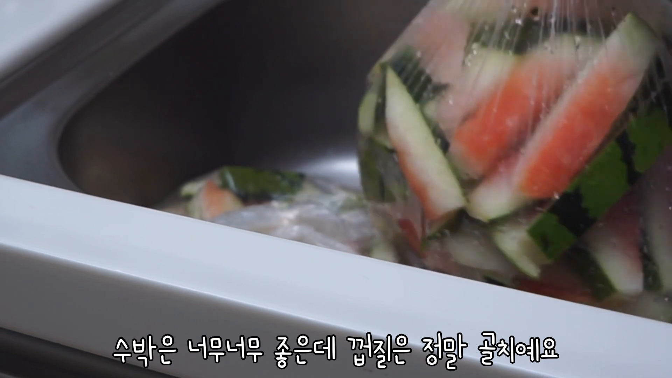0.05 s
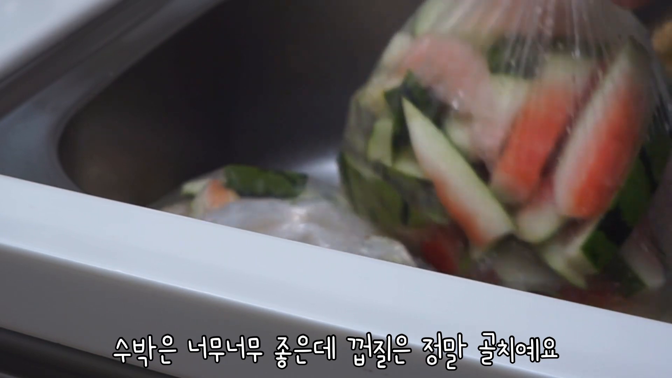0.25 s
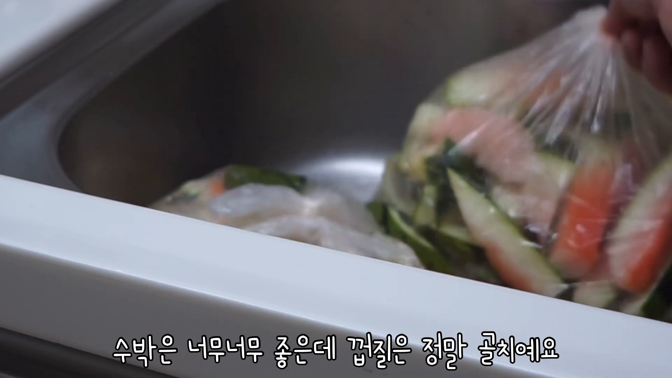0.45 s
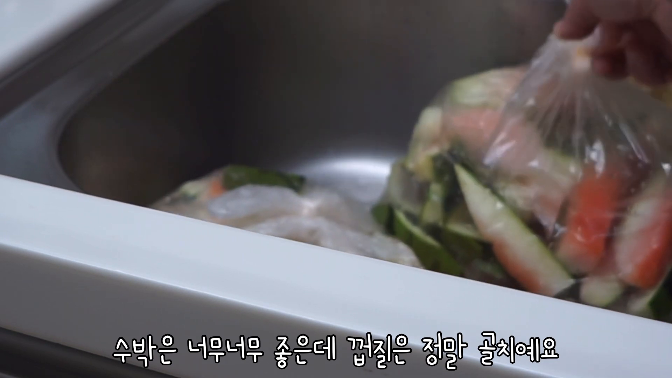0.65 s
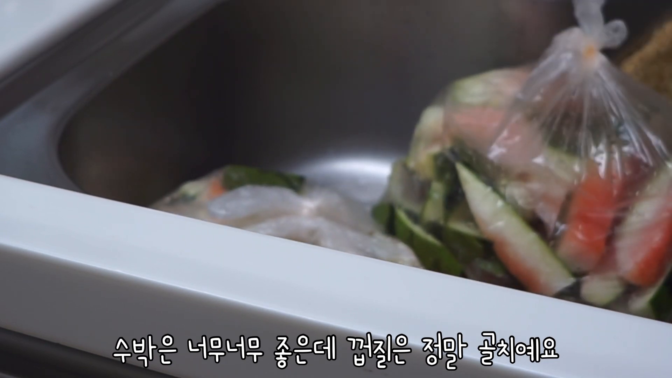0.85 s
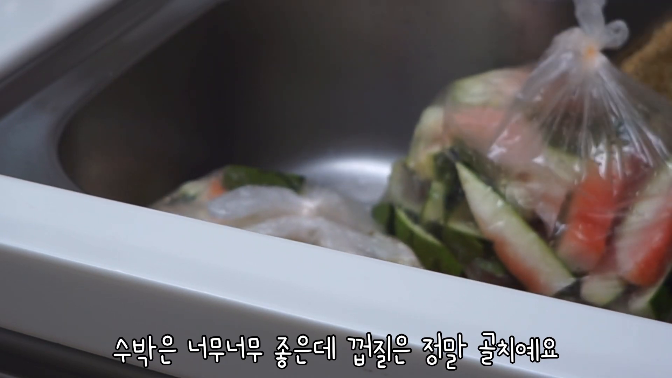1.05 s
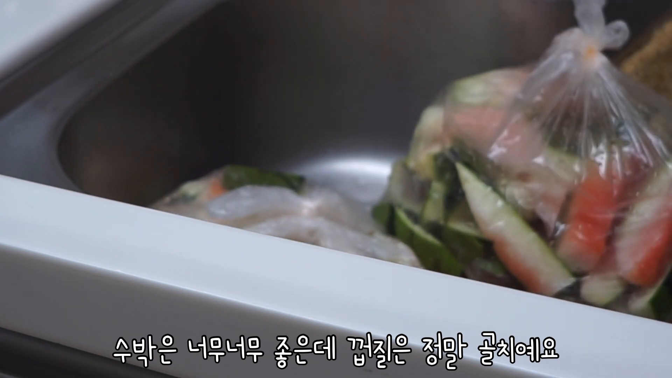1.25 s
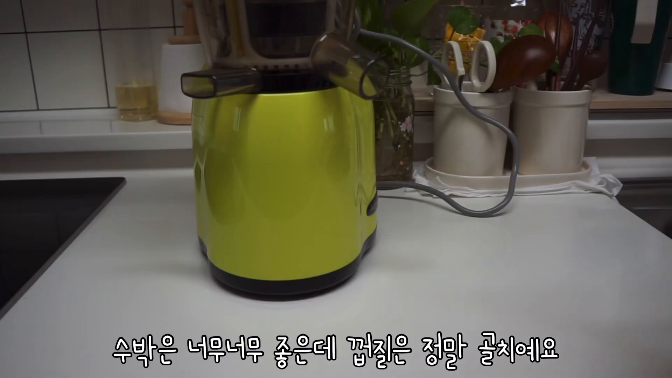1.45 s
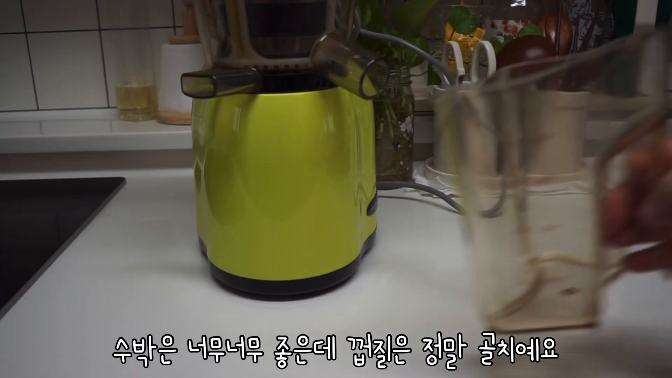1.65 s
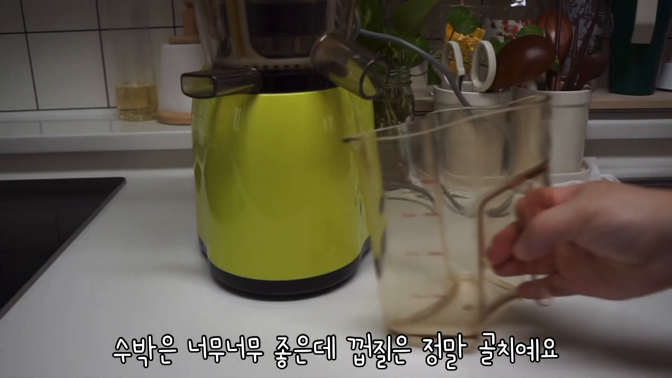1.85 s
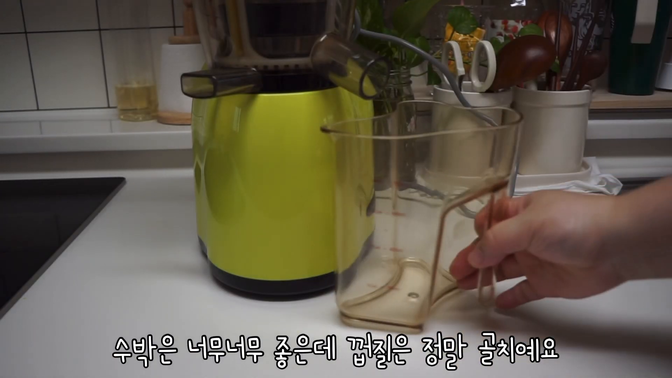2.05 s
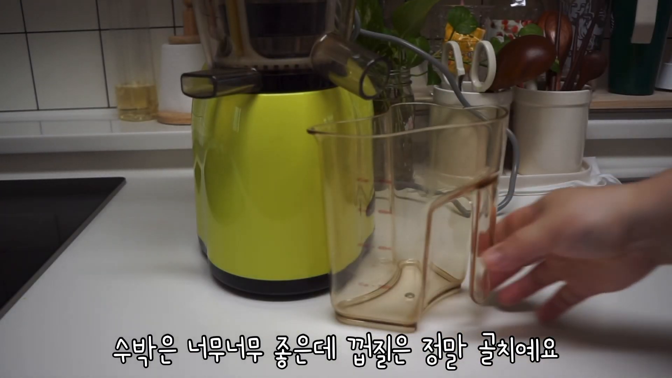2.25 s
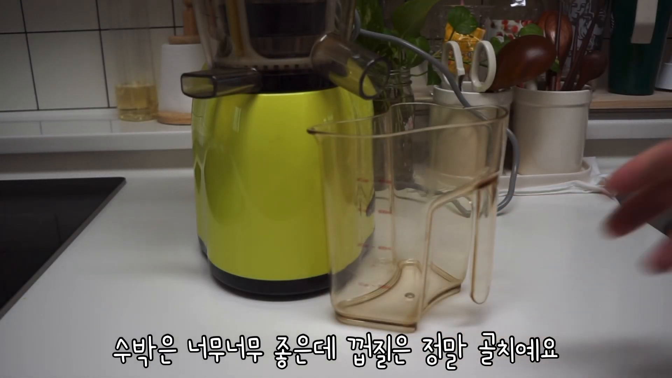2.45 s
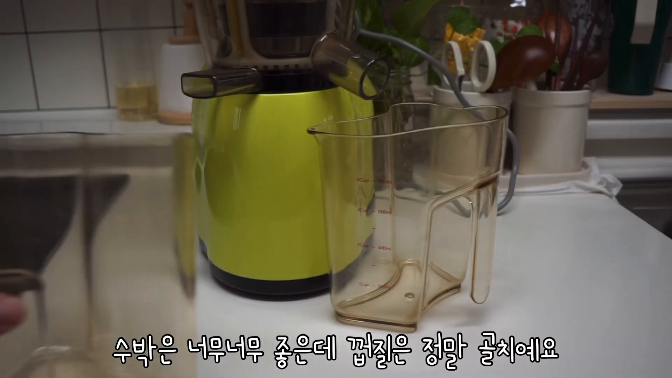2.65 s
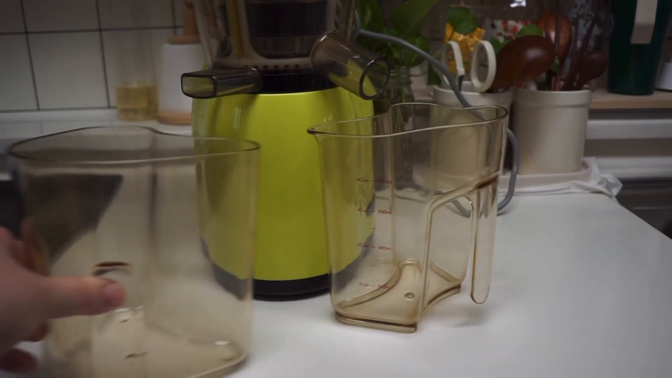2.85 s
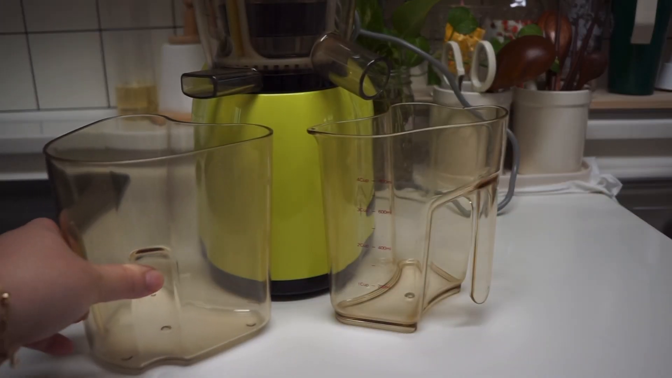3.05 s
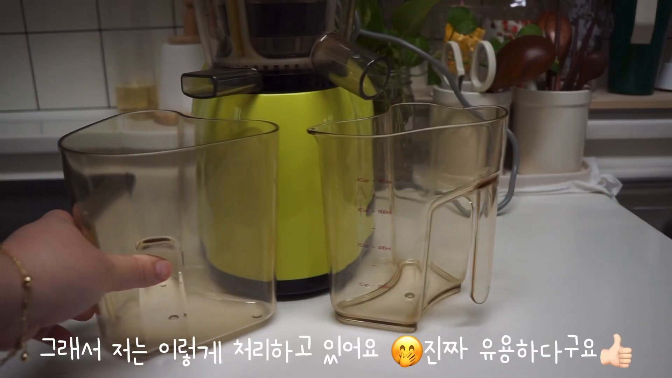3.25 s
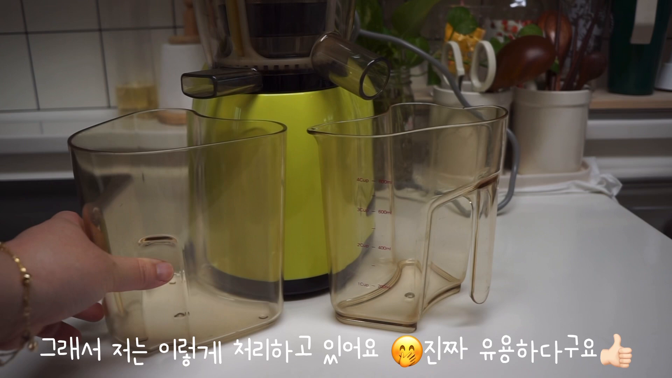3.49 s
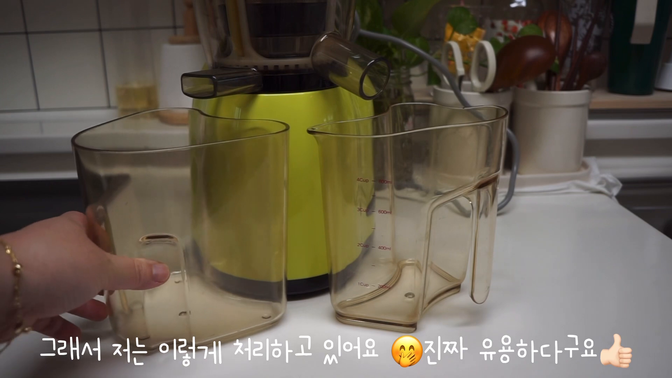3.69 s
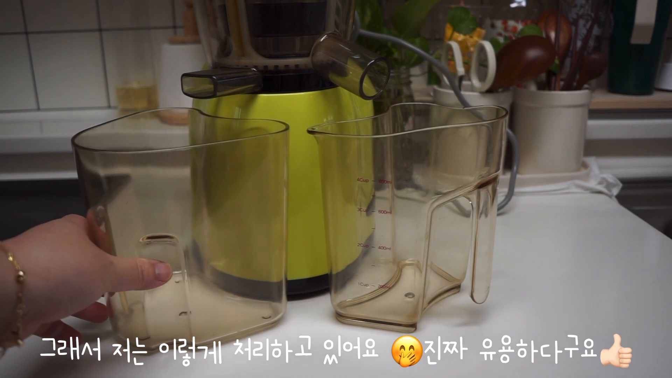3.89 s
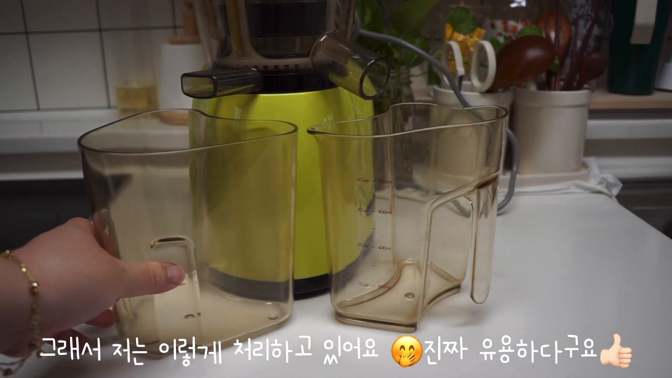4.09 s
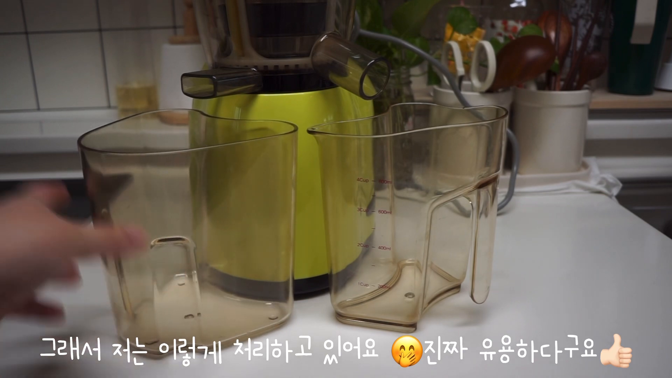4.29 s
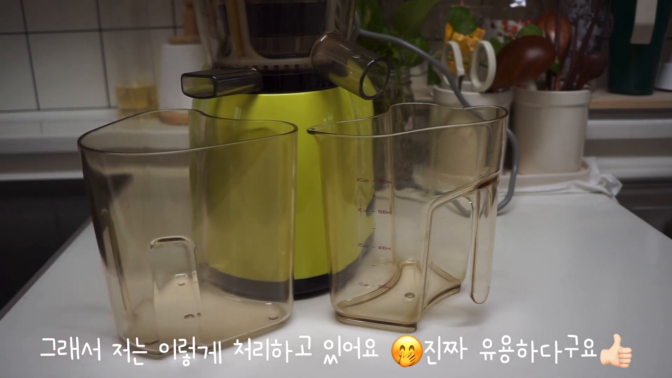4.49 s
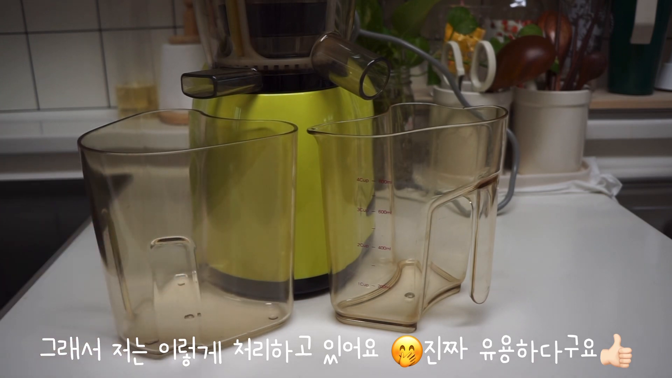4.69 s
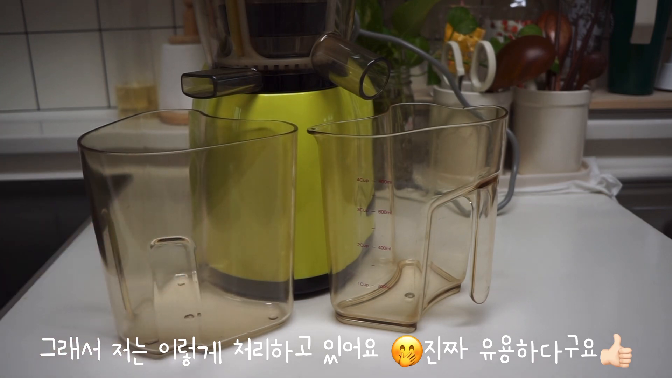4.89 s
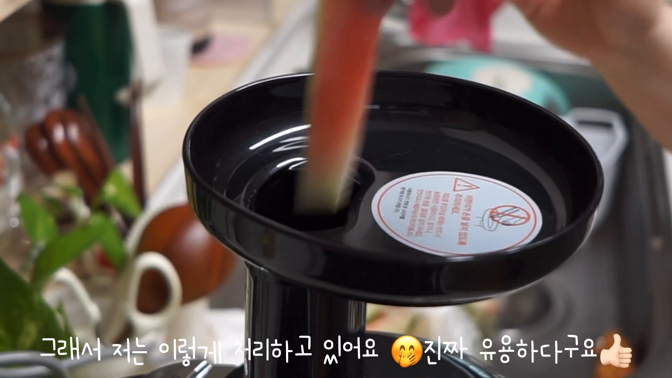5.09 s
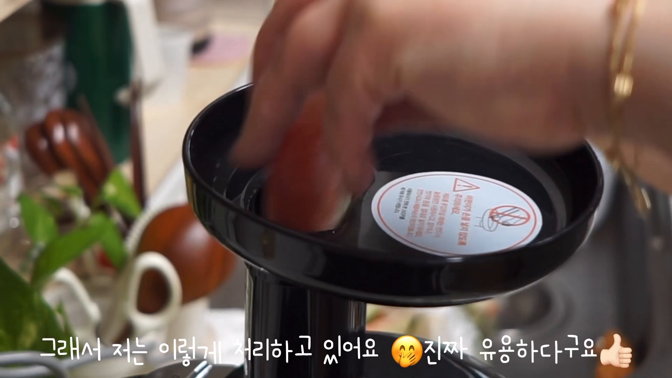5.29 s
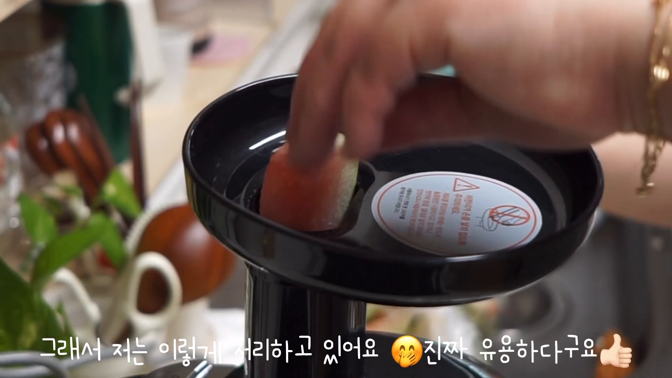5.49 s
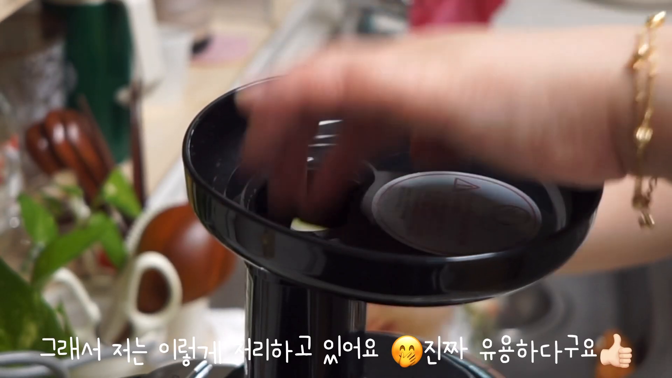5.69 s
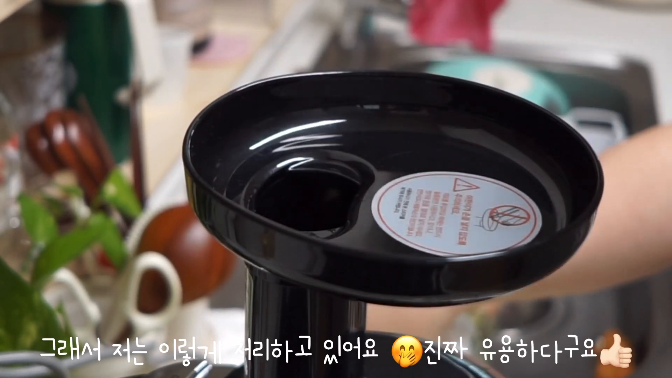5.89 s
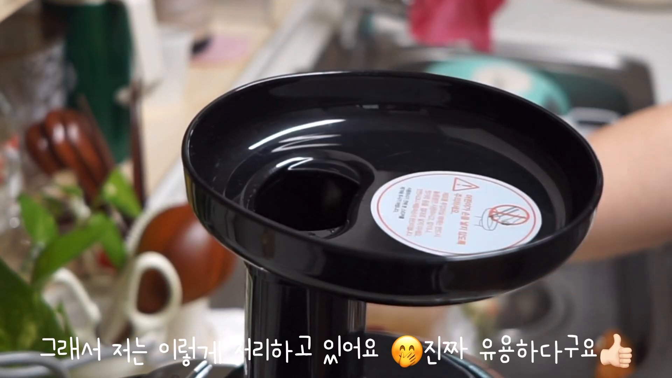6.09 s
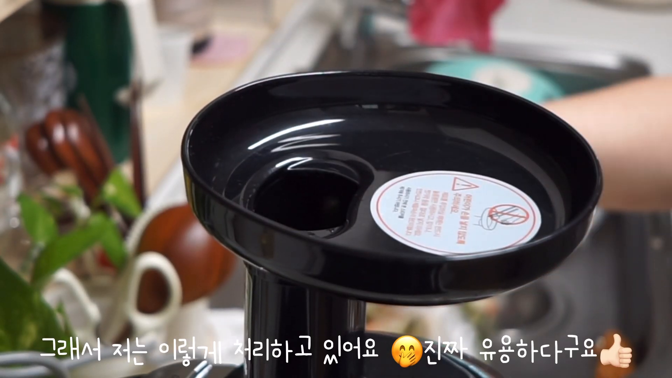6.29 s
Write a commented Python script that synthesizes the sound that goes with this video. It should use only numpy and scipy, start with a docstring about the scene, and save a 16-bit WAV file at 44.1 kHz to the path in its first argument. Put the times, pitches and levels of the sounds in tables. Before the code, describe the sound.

Thin film rustling and a soft sink thud, hollow plastic knocks and scrapes on a countertop, a tiny silence, then quiet ticking juicer grinding and cracking rind.

```python
"""Plastic jugs, then a juicer

A plastic bag of fruit rind crackles into a steel sink; two hard plastic jugs are set down and nudged along a counter.
Each knock rings damped wall modes, chatters on the base and dies away in a tiled room; ticks and hum lie between.
After a short silence a slow juicer grinds: coloured noise and motor lines, with ticking teeth and cracking rind."""
import sys
import numpy as np
from scipy import signal
from scipy.fft import rfft, irfft
from scipy.io import wavfile
from scipy.ndimage import uniform_filter1d

SR = 44100
rng = np.random.default_rng(int(sys.argv[2]) if len(sys.argv) > 2 else 0)


def master_out(mix):
    """Clip the mix to full scale and print it as 16-bit PCM to the path in sys.argv[1]."""
    frames = np.transpose(np.atleast_2d(mix))
    ceiling = np.clip(frames, -1, 1)
    pcm = np.round(ceiling * 32767).astype(np.int16)
    wavfile.write(sys.argv[1], SR, pcm)


N = 279594
T = np.arange(N) / SR

# Wall modes of the two jugs. Each row: pitch in Hz, relative level in dB, t60 in s with no grip.
TALL_JUG_MODES = [(424, -15.5, 0.21), (477, -46, 0.11), (582.6, 0, 0.16), (615, -6.5, 0.12),
                  (688, -4.5, 0.093), (770, -8.5, 0.12), (962.6, -9, 0.14), (1217, -3, 0.14),
                  (1410, -5, 0.061), (1683, -11.5, 0.075), (1986, -22, 0.074), (2335, -14.5, 0.036),
                  (2640, -21, 0.058), (3135, -21.5, 0.045), (3790, -22.5, 0.026), (5000, -39, .04),
                  (5840, -28.5, 0.037)]
WIDE_JUG_MODES = [(343.2, -11.5, 0.34), (412, -18.5, 0.11), (431.6, -21, 0.38), (539.6, -8, 0.25),
                  (538.5, -3, 0.1), (595.4, 2, 0.09), (702, -5.5, 0.061), (837, -0.5, 0.044),
                  (1016, -5, 0.076), (1211, -8.5, 0.083), (1352, -10, 0.076), (1578, -16, .12),
                  (1833, -14.5, 0.12), (2070, -19.5, 0.1), (2260, -5, 0.032), (2397, -32, 0.37),
                  (2610, -13.5, 0.085), (2940, -18.5, 0.05), (3550, -11.5, 0.032), (4340, -21.5, 0.03),
                  (5220, -22.5, 0.048), (8800, -53, .03)]
WIDE_JUG_FROM_S = 2.7
# Course of the grinding. Each row: time in s, level in dB.
GRINDING = [(5.055, -66.5), (5.19, -61.5), (5.28, -55), (5.45, -53.5), (5.6, -48), (5.9, -47), (6.27, -45),
            (6.34, -37.5)]
TOOTH_FIRST_S, TOOTH_GAP_S = 5.063, .0359


def undb(db):
    """Amplitude factor of a level in dB."""
    return 10 ** (np.asarray(db) / 20)


def on_log(hz, table):
    """Reads (Hz, value) points on a log-frequency axis."""
    at, value = np.transpose(table)
    return np.interp(np.log(np.maximum(hz, 1)), np.log(at), value)


def curve(table, outside):
    """Each column of a time table at every sample."""
    s, *columns = np.transpose(table)
    return [np.interp(T, s, c, outside, outside) for c in columns]


def band(x, lo_hz, hi_hz):
    """Butterworth bandpass."""
    sos = signal.butter(2, [lo_hz, min(hi_hz, .45 * SR)], "band", fs=SR, output="sos")
    return signal.sosfilt(sos, x)


def unit(x):
    """Scales to rms 1."""
    return x / np.sqrt(np.mean(x ** 2))


def pan(left_minus_right_db):
    """Gains of the left and right channels."""
    return undb([[left_minus_right_db / 2], [-left_minus_right_db / 2]])


def spread(mid, side, colour):
    """Colours two noises and mixes them to a stereo pair whose likeness varies with pitch; rms 1."""
    # Each row: frequency in Hz, left-right correlation from 0 to 1.
    likeness = [(60, 0.51), (140, 0.94), (300, 1), (1000, 0.68), (3000, 0.2), (8000, 0.11)]
    hz = np.arange(len(mid) // 2 + 1) * SR / len(mid)
    like = np.clip(on_log(hz, likeness), 0, 1)
    m = rfft(mid) * np.sqrt(1 + like)
    s = rfft(side) * np.sqrt(1 - like)
    pair = np.array([m + s, m - s]) * undb(on_log(hz, colour))
    return unit(irfft(pair, len(mid)))


def walk(rate_hz):
    """Slow random drift of rms near 1: smoothed random steps."""
    k = int(SR / rate_hz)
    steps = np.repeat(rng.standard_normal(N // k + 1), k)
    return unit(uniform_filter1d(steps, k)[:N])


def ring(modes, extra_db, grip=0., size=14000):
    """Answer of damped modes to one blow; a gripping hand damps them, and each blow finds them slightly changed."""
    hz, db, t60_s = np.transpose(modes)[:, :, None]
    shift, luck, phase = rng.standard_normal((3, len(hz), 1))
    t = np.arange(size) / SR
    fade_db = 60 * t / t60_s * (1 + 1.59 * np.clip(grip, 0, 1))
    hz = hz * (1 + .004 * shift)
    waves = undb(db + extra_db + 2.1 * luck - fade_db) * np.sin(2 * np.pi * hz * t + 1.99 * phase)
    # thin shells radiate little at low pitch
    return signal.sosfilt(signal.butter(4, 250, "high", fs=SR, output="sos"), np.sum(waves, axis=0))


def add(out, s, x):
    """Adds x into out from time s."""
    i = int(s * SR)
    out[i:i + len(x)] += x[:N - i]


def crackle(size, scatter_db):
    """Dense clicks of very uneven size; rms 1."""
    size_db = scatter_db * np.minimum(rng.exponential(size=size), 4.0)
    return unit(rng.standard_normal(size) * undb(size_db))


def snaps(table, rise_s):
    """Short bursts of crackle: a pitched part, a dull body and a wide treble."""
    out, t = np.zeros(N), np.arange(5000) / SR
    for s, db, hz, body_db, treble_db, t60_s in table:
        noise = crackle(len(t), 0.95)
        burst = unit(band(noise, hz / 2.24, hz * 1.204))
        burst += undb(treble_db) * unit(band(noise, 2500, 11500))
        burst += undb(body_db) * unit(band(noise, 620, 1860))
        rise = np.minimum(t / rise_s, 1)
        add(out, s, burst * rise * undb(db - 4 - 60 * t / t60_s))
    return out


def steady(colour, body_db, hiss_colour, treble_db):
    """Coloured body and a second coloured noise as hiss, each with its own level and flicker."""
    body = spread(*rng.standard_normal((2, N)), colour) * undb(body_db + 1.84 * walk(18))
    hiss = spread(*rng.standard_normal((2, N)), hiss_colour)
    return body + hiss * undb(treble_db + 2.3 * walk(45))


def bag():
    """Thin film crackles densely as it folds; the load settles on the steel in falling thuds."""
    # Bag handling. Each row: time in s, rustle level in dB.
    rustle = [(0.0, -39), (0.036, -34), (0.122, -34.5), (0.256, -27.5), (0.332, -27), (0.366, -22),
              (0.616, -38.5), (0.666, -35.5), (0.722, -39.5), (0.786, -58.5), (0.8, -52)]
    # Film colour. Each row: frequency in Hz, relative spectrum level in dB.
    film_colour = [(88, -41), (150, -30.5), (497, -11), (741, -13.5), (1130, -8), (1560, -10), (2290, -5.5),
                   (10100, -7.5), (10900, -5), (11500, -75), (15000, -60), (22000, -120)]
    # Sink modes. Each row: pitch in Hz, relative level in dB, t60 in s without a load.
    sink_modes = [(186, -3, 0.27), (316, 3.5, 0.14), (459, 7, 0.083), (536, 0, 0.19), (591, 0.5, 0.16),
                  (850, -1, 0.08), (1110, 2.5, .08)]
    lands_s, lands_db, settle_gap_s, settle_db_per_s = .34, -18, .022, -110
    thuds, load_damps = 5, .8  # damping of the steel by the bag, 0-1
    db, = curve(rustle, -150)
    film = spread(crackle(N, 2.4), crackle(N, 3.3), film_colour) * undb(db + 1.02 * walk(60.0))
    thud = np.zeros(N)
    for late_s in settle_gap_s * np.arange(thuds):
        push = rng.standard_normal(900) * np.hanning(900) / 56
        blow = signal.fftconvolve(push, ring(sink_modes, 0, load_damps))
        add(thud, lands_s + late_s, undb(lands_db + settle_db_per_s * late_s) * blow)
    return film * pan(-3.5) + thud


def kitchen():
    """Room tone of two noises, a low hum wavering in pitch and level, and thin whistles."""
    # Room tone. Each row: time in s, body level in dB, treble level in dB.
    tone = [(.8, -55, -54.5), (1.45, -56, -58), (1.75, -53.5, -61.5), (2.3, -54, -66), (2.652, -50, -66),
            (2.661, -52, -49), (3.2, -50.5, -51), (3.5, -54.5, -65), (4.3, -54.5, -65.5),
            (4.698, -51, -67.5), (5.02, -48.5, -58)]
    # Body and hiss colours. Each row: frequency in Hz, relative spectrum level in dB.
    body_colour = [(24, -79), (40, -63), (150, -17.5), (283, -7), (319, -8), (543, -7.5), (908, -9.5),
                   (1350, -14), (2250, -18.5), (2440, -17), (2860, -21), (4500, -44), (5850, -72.5),
                   (9900, -120)]
    hiss_colour = [(1500, -37), (3000, 2.5), (6000, -2.5), (11000, -2.5)]
    # Hum. Each row: time in s, pitch in Hz, level in dB.
    hum_course = [(1.199, 325, -70), (1.321, 230, -66.5), (1.6, 246, -57), (1.75, 250, -67),
                  (2.4, 223, -62), (4.299, 265, -67.5), (4.65, 265, -52), (4.8, 285, -61.5), (5, 296, -47)]
    s, body_db, treble_db = np.transpose(tone)
    s_hum, hz, db = np.transpose(hum_course)
    phase = np.cumsum(np.interp(T, s_hum, hz) * (1 + 0.016 * walk(40))) / SR
    hum = np.sin(2 * np.pi * phase) * undb(np.interp(T, s_hum, db) + 3.9 * walk(60))
    air = steady(body_colour, np.interp(T, s, body_db), hiss_colour, np.interp(T, s, treble_db))
    return air + hum + whistles()


def ticks():
    """Fingers and plastic tick: short bursts of banded crackle."""
    # Each row: start in s, level in dB before a common trim, pitch in Hz, body dB and treble dB
    # relative to the pitched part, t60 in s.
    tick_rows = [(.897, -52.5, 6260, -29, 15.5, 0.012), (1.301, -48, 3940, 7.5, -14, .02),
                 (1.384, -52.5, 1500, 12.5, 11, 0.022), (2.236, -43, 9550, -35, -6, 0.011),
                 (2.326, -26.5, 2700, -26, -9, 0.018), (2.389, -42.5, 2830, -33, -8, 0.034)]
    return snaps(tick_rows, rise_s=0.00051)


def room(x):
    """Tiled walls answer with a noise tail in octave bands; the bass rings longest."""
    # Decay. Each row: frequency in Hz, t60 in s.
    decay = [(200, 0.52), (1000, 0.34), (4000, 0.36), (10000, 0.3)]
    # Tail colour. Each row: frequency in Hz, relative spectrum level in dB.
    tail_colour = [(100, 2), (600, -2.5), (1500, 1), (12000, 0.5)]
    t, tail = np.arange(int(.7 * SR)) / SR, 0
    for hz in 125 * 2. ** np.arange(7.5):
        pair = spread(*rng.standard_normal((2, len(t))), tail_colour)
        octave = band(pair, hz / np.sqrt(2), hz * np.sqrt(2))
        tail = tail + octave * undb(-60 * t / on_log(hz, decay))
    tail = tail * np.minimum(t / 0.00097, 1)
    tail = tail / np.sqrt(np.sum(tail ** 2) / 2)
    return signal.fftconvolve(x[None], tail, axes=1)[:, :N]


def whistles():
    """Faint narrow bands of noise that come and go."""
    # Each row: start in s, end in s, pitch in Hz, level in dB.
    whistle_rows = [(0.958, 1.35, 3630, -70), (1.392, 1.782, 2790, -68.5), (2.662, 2.75, 2470, -60)]
    out = np.zeros(N)
    for start, end, hz, db in whistle_rows:
        size = int((end - start) * SR)
        tone = unit(band(rng.standard_normal(size), hz - 40, hz + 40))
        add(out, start, undb(db) * np.hanning(size) ** 0.25 * tone)
    return out


def jug_modes(s):
    """Wall modes of the jug in use at time s."""
    return WIDE_JUG_MODES if s > WIDE_JUG_FROM_S else TALL_JUG_MODES


def jugs():
    """Every blow strikes another spot, so it weights the wall modes anew; the base chatters after it."""
    # Jug meets counter. Each row: start in s, blow in dB, tilt of low walls in dB per octave under the body pitch,
    # tilt of bright walls in dB per octave over it, boost round the floor pitch in dB, crack in dB,
    # chatter in dB, chatter time in s, grip from 0 to 1. The dB levels are before common trims.
    knocks = [(1.785, -12, -23, 7.5, 1.5, -7.5, -10.5, 0.015, 1),
              (1.817, -17, -21, 1, 6, -22, -20, .035, 1),
              (1.835, -14, 11, 1.8, 7.5, -10.5, -25, 0.041, 0.2),
              (1.857, -14, 21, -6, 5, -22.5, -11.5, 0.044, .6),
              (1.981, -3, 11, 3, -11.5, -17, -4.5, 0.023, 0.6),
              (2.003, -14, 2, 2.5, 1, -29.5, -7, 0.036, 0.5),
              (2.143, -9, 2, -0.5, -13, -40, -6.5, 0.015, 0.2),
              (2.157, -16.5, 5, -8, -2, -37, -38, 0.03, 0.1),
              (2.763, -13.5, 6, 3.5, 3, 0.5, -8, 0.0061, 0.13),
              (2.803, -19, 11, -4, 13, -15, -6, 0.038, 0.07),
              (2.834, -17.5, -18, 4.5, -14, -4, -2, 0.014, 0.7),
              (2.872, -16.5, 3, -8, -5, -26, -4, 0.021, 0.6),
              (2.966, -6, -8.5, 1.9, -7.5, -1, -6, 0.021, 0.07),
              (3.007, -14, 0, -6, -6, -23, -8, 0.031, 0.3), (3.229, -16, 16.5, 4.5, -2, 0, 1, 0.016, 0.45),
              (3.249, -9.5, 6, -0.7, 4, -15, -6, 0.027, 0.46),
              (3.658, -16.5, -6, 3, 5.5, -1, 0.5, 0.026, 0.76),
              (3.674, -8, 1, 4.5, 2, -18, -10, 0.027, .99), (3.757, -30.5, -5, 8, 8, -9, -9.5, 0.018, .99),
              (3.902, -11.5, -14, 2.5, -0.5, -13.5, -5, 0.03, 1),
              (3.92, -18.5, 11, 2.5, 4, -11, 0.5, .015, 0.9), (3.941, -18, 3, -4, -13, -27, -8, 0.017, .55),
              (4.179, -14, -11, -1.3, -10, -26, -5.5, .012, 0.6),
              (4.199, -23.5, 7, -12, 4, -27, -18, 0.019, 0.4)]
    body_hz, floor_hz, floor_octaves, contact_s = 603, 1080, 0.6, 0.0025
    out, t = np.zeros(N), np.arange(6000) / SR
    for s, blow_db, low_db, bright_db, floor_db, crack_db, chatter_db, chatter_s, grip in knocks:
        modes = jug_modes(s)
        octaves = np.log2(np.array(modes)[:, :1] / body_hz)
        spot_db = np.where(octaves > 0, bright_db, -low_db) * octaves
        from_floor = (octaves - np.log2(floor_hz / body_hz)) / floor_octaves
        spot_db += floor_db * np.exp(-from_floor ** 2)
        settle = np.exp(-(t / chatter_s) ** 2)
        push = undb(chatter_db - 24) * settle * crackle(len(t), 1.75)
        push[0] += 1  # the blow itself
        walls = signal.fftconvolve(push, ring(modes, spot_db, grip))
        # a glancing contact lets the walls build up
        swell = np.minimum(np.arange(len(walls)) / SR / contact_s, 1)
        add(out, s, undb(blow_db - 9) * walls * swell)
        # countless short high modes merge into a noisy clack
        shape = undb(-60 * t / 0.02) + undb(chatter_db - 13.5) * settle
        clack = shape * swell[:len(t)] ** .5 * band(crackle(len(t), 1.6), 780, 11600)
        add(out, s, undb(blow_db + crack_db) * clack)
        # dull contact of base and counter
        thud = unit(band(rng.standard_normal(len(t)), 380, 1030))
        add(out, s, undb(blow_db - 19.0) * thud * settle * swell[:len(t)])
    return out


def slides():
    """Grit under a sliding base hisses and keeps the walls singing, fading as the jug slows."""
    # Each row: start in s, end in s, scrape at the start in dB, singing walls at the start in dB, grip from 0 to 1.
    slide_rows = [(1.791, 1.976, -45.5, -26, 0.66), (2.772, 2.97, -40.5, -26.5, .3),
                  (3.688, 3.816, -63, -42, 1)]
    scrape_db_per_s, sing_db_per_s = -7.5, -83.5
    out = np.zeros(N)
    for start, end, scrape_db, sing_db, grip in slide_rows:
        walls = ring(jug_modes(start), 0, grip)
        walls = walls / np.sqrt(np.sum(walls ** 2))
        t = np.arange(int((end - start) * SR)) / SR
        grit = crackle(len(t), 5.4)
        drive = grit * undb(sing_db + sing_db_per_s * t)
        add(out, start, signal.fftconvolve(drive, walls))
        add(out, start, undb(scrape_db + scrape_db_per_s * t) * band(grit, 2700, 12000))
    return out


def juicer():
    """Gears rumble in the throbbing housing over the motor's hum; wet hiss grows with the grinding."""
    # Gear and wet pulp colours. Each row: frequency in Hz, relative spectrum level in dB.
    gear_colour = [(35, -71.5), (60, -46), (106, -26), (186, -21.5), (232, -16), (284, -14.5), (389, -4.5),
                   (641, -9.5), (878, -11), (1020, -3), (2430, -7), (3330, -17), (5000, -26), (6500, -27),
                   (11000, -120)]
    pulp_colour = [(2000, -34), (3500, -1), (4600, 1), (6500, 2.5), (11000, -1)]
    # Housing bands. Each row: centre in Hz, width in Hz, mean dB relative to the grinding.
    housing = [(875, 50, -8), (1200, 200, -8), (2600, 450, -8), (4600, 600, -22)]
    # Motor hum lines. Each row: pitch in Hz, dB relative to the grinding.
    motor_lines = [(120, -30), (240, -15.5)]
    pulp_db, pulp_grows, grind_mid_db = -10.5, 0.47, -50  # grows: extra dB per dB above the mid level
    throb_db, throb_s = 7, .012
    db, = curve(GRINDING, -150)
    body = 0
    for hz, width_hz, band_db in housing:
        flicker = undb(band_db + 1.54 * walk(30))
        body = body + flicker * unit(band(crackle(N, 2.8), hz - width_hz / 2, hz + width_hz / 2))
    # each tooth shakes the housing
    since_tooth_s = (T - TOOTH_FIRST_S) % TOOTH_GAP_S
    body = body * undb(throb_db * (np.exp(-since_tooth_s / throb_s) - throb_s / TOOTH_GAP_S))
    motor = sum(undb(line_db) * np.sin(2 * np.pi * hz * T) for hz, line_db in motor_lines)
    wet_db = db + pulp_db + pulp_grows * (db - grind_mid_db)
    return steady(gear_colour, db + 2.6 * walk(25), pulp_colour, wet_db) + undb(db) * (body + motor)


def crunches():
    """Gear teeth tick at a steady rate, uneven in strength; rind cracks in the screw."""
    # Rind cracks. Each row: start in s, level in dB before a common trim, body dB relative to the pitched part.
    cracks = [(5.0998, -57, -7.5), (5.2779, -43, -13), (5.3135, -47.5, -3), (5.3842, -42.5, -2),
              (5.6371, -30, -0.5), (5.6705, -34, 1), (5.6974, -44, 12), (5.7798, -35, 5.5),
              (5.8855, -52, 18.5), (5.9239, -45, -11), (5.9863, -31.5, 2.5), (6.0122, -30, 7.5),
              (6.105, -33.5, -20), (6.1814, -43, -10), (6.3086, -33, 4)]
    # Three teeth a turn: mean level of each over the grinding, in dB before a common trim.
    turn_db = [9, 8, 0]
    # Tooth sound: pitch in Hz, body dB and treble dB relative to the pitched part, t60 in s.
    tooth_sound = (2696, -2.8, -15.5, 0.0339)
    crack_hz, crack_treble_db, crack_t60_s = 4160, -5, 0.049
    s = np.arange(TOOTH_FIRST_S, N / SR, TOOTH_GAP_S)
    db = np.interp(s, *np.transpose(GRINDING)) + np.resize(turn_db, len(s))
    db = db + 2.5 * rng.standard_normal(len(s))
    rows = [(at, tick_db, *tooth_sound) for at, tick_db in zip(s, db)]
    rows += [(at, level_db, crack_hz, body_db, crack_treble_db, crack_t60_s) for at, level_db, body_db in cracks]
    return snaps(rows, rise_s=.003)


def scene():
    """Counter first, then the juicer, parted by a short silence."""
    # Silence: start in s, end in s.
    silence_from_s, silence_to_s = (5.018, 5.056)
    left_leads_samples, room_db, juicer_room_db = 2, -7, -4
    near = jugs() + slides() + ticks()
    direct = np.array([near, np.roll(near, left_leads_samples)]) * pan(-1.2)
    counter = direct + undb(room_db) * room(near) + bag() + kitchen() * pan(-1)
    crunch = crunches()
    machine = juicer() + crunch + undb(juicer_room_db) * room(crunch)
    fade_out = np.clip((silence_from_s - T) / 0.0018, 0, 1)
    fade_in = np.clip((T - silence_to_s) / 0.0038, 0, 1)
    return counter * fade_out + machine * fade_in


def record(dry):
    """A small microphone drops the bass and the recorder cuts the top."""
    thin = signal.sosfilt(signal.butter(1, 120, "high", fs=SR, output="sos"), dry)
    top_hz = 11050
    return signal.sosfilt(signal.ellip(9, .2, 75, top_hz, fs=SR, output="sos"), thin)


dry = scene()
out = record(dry)
master_out(out)
```